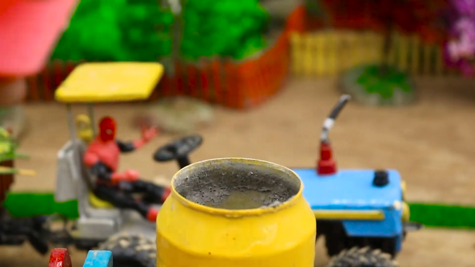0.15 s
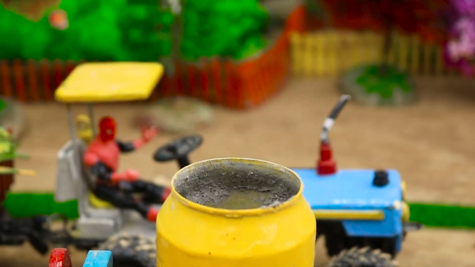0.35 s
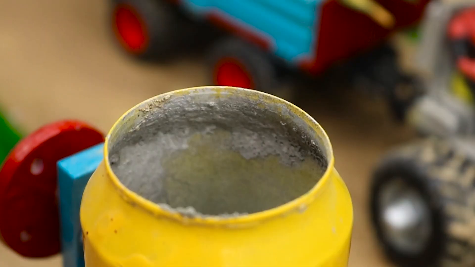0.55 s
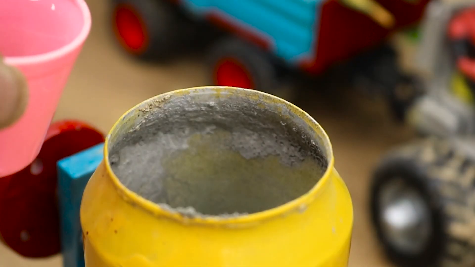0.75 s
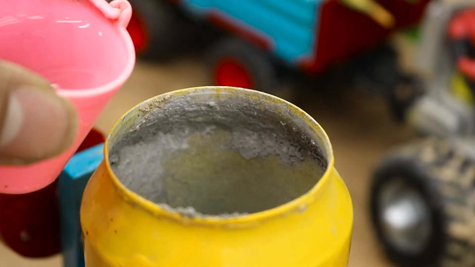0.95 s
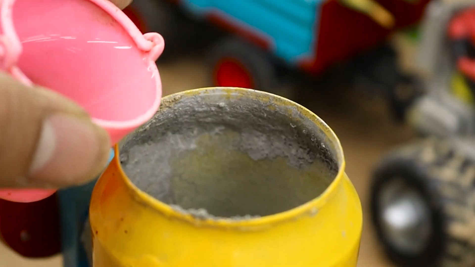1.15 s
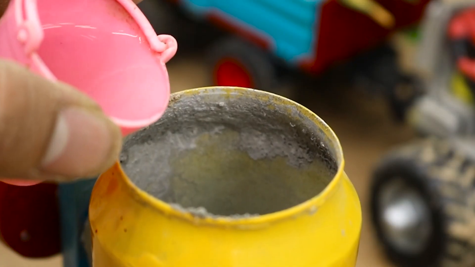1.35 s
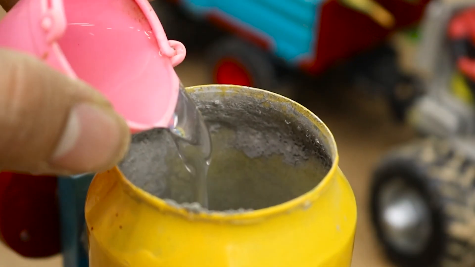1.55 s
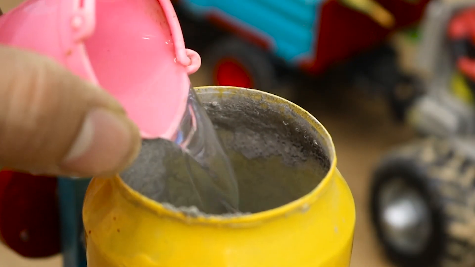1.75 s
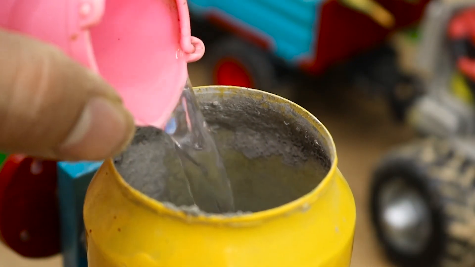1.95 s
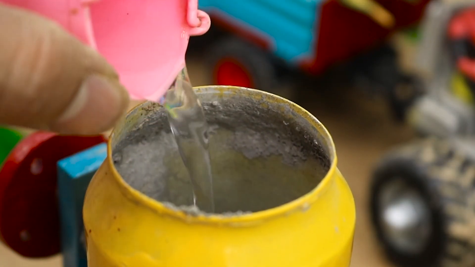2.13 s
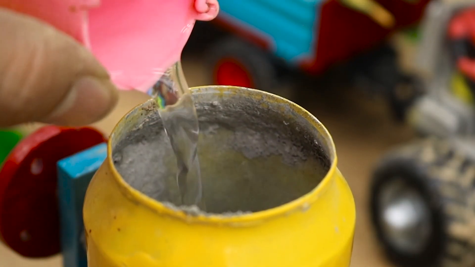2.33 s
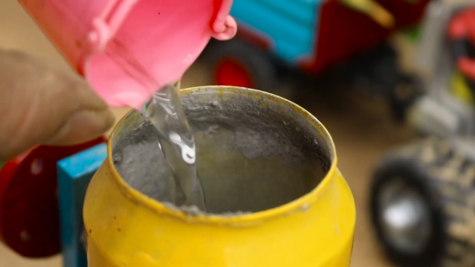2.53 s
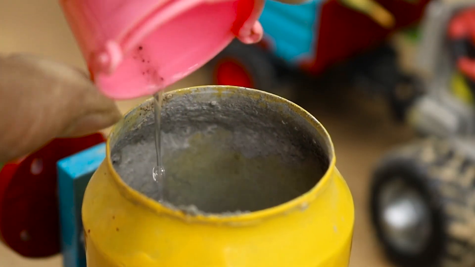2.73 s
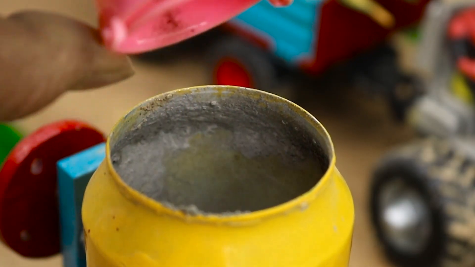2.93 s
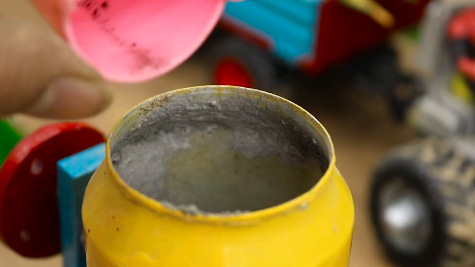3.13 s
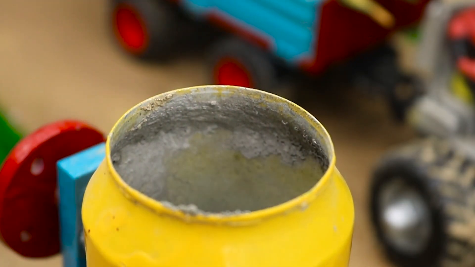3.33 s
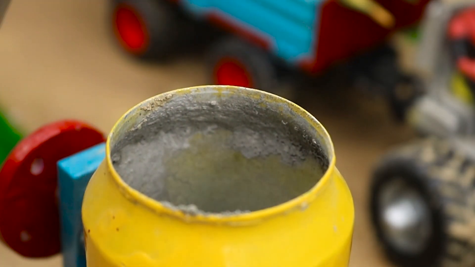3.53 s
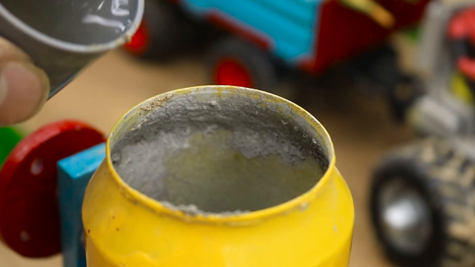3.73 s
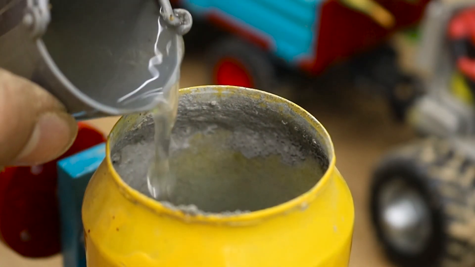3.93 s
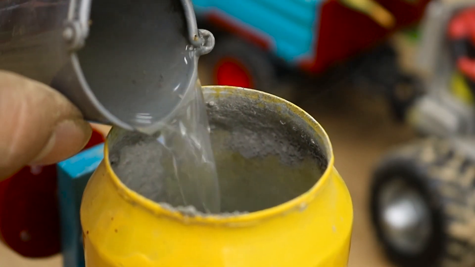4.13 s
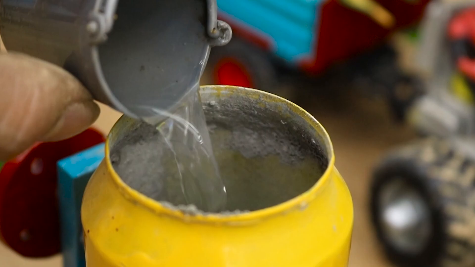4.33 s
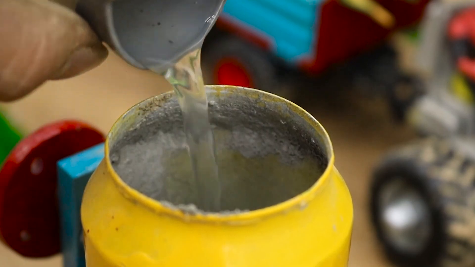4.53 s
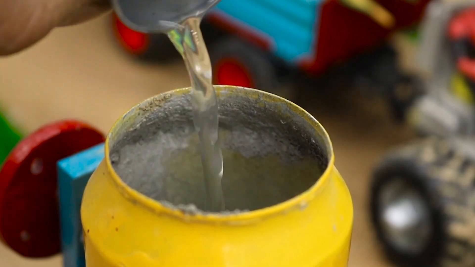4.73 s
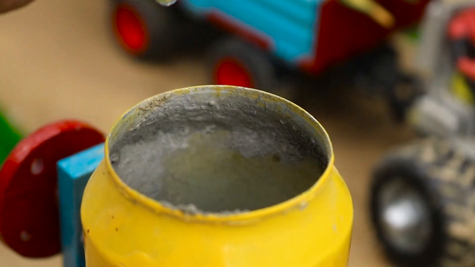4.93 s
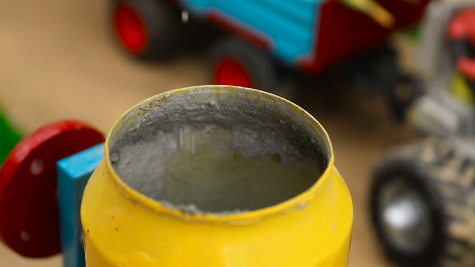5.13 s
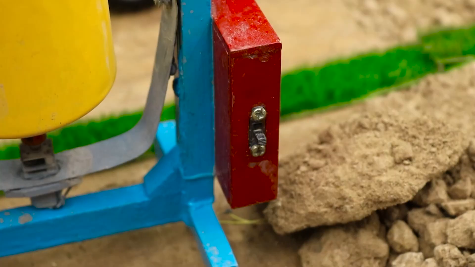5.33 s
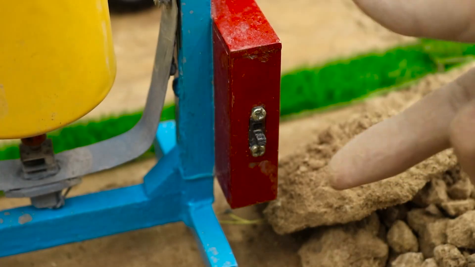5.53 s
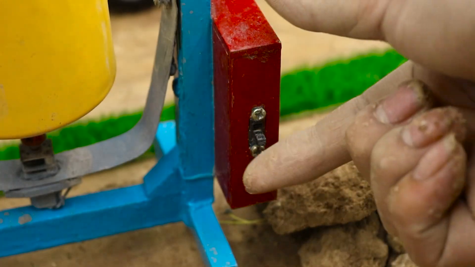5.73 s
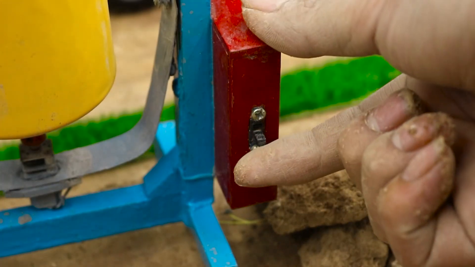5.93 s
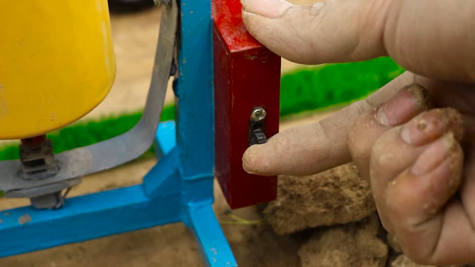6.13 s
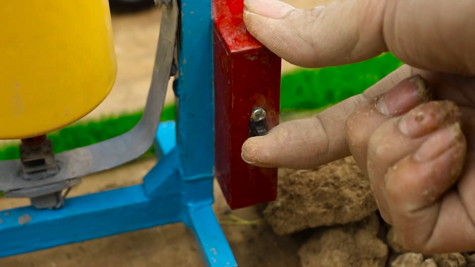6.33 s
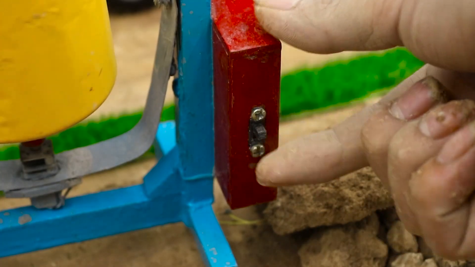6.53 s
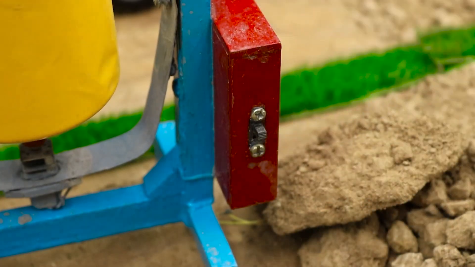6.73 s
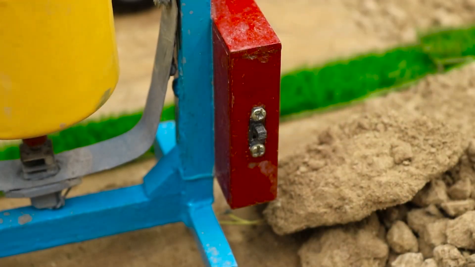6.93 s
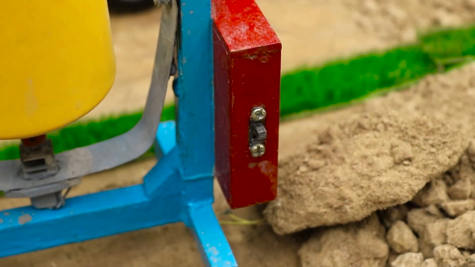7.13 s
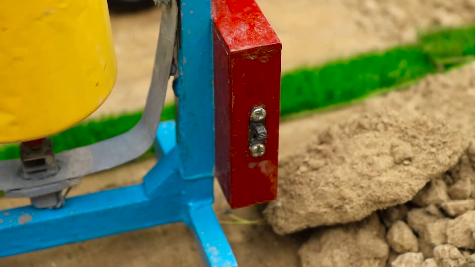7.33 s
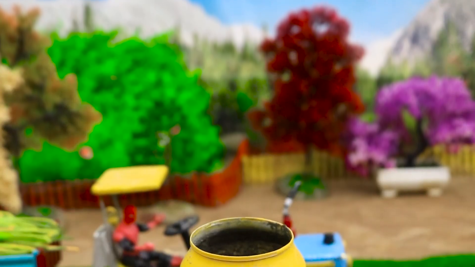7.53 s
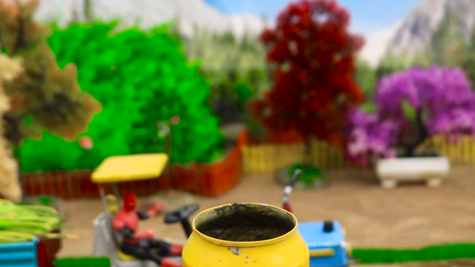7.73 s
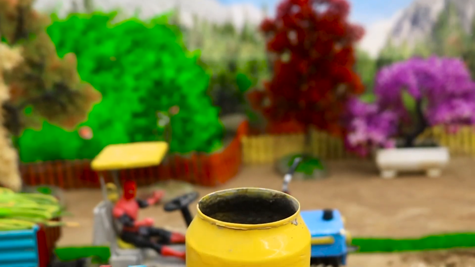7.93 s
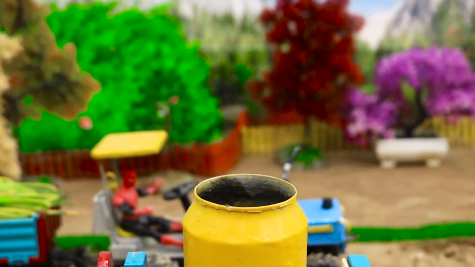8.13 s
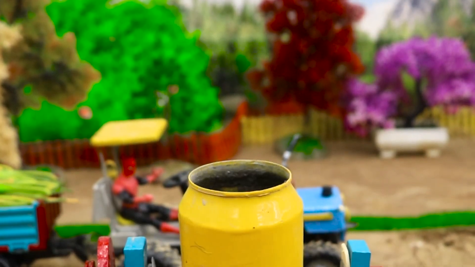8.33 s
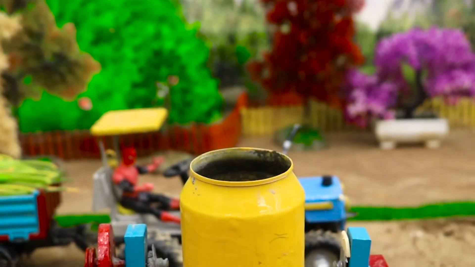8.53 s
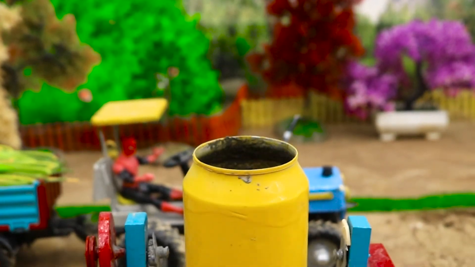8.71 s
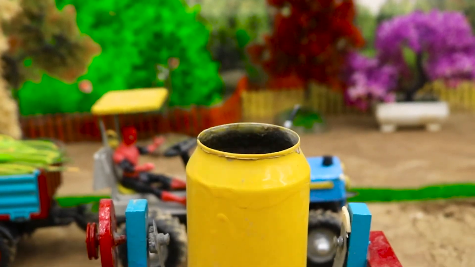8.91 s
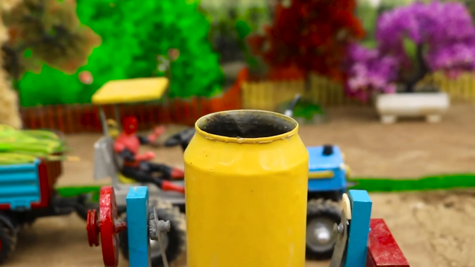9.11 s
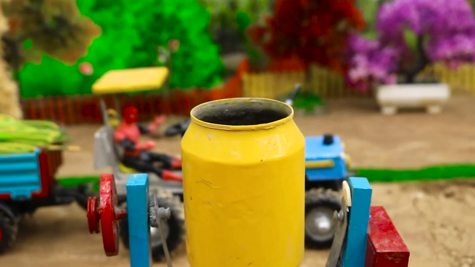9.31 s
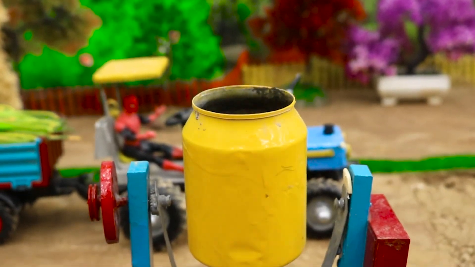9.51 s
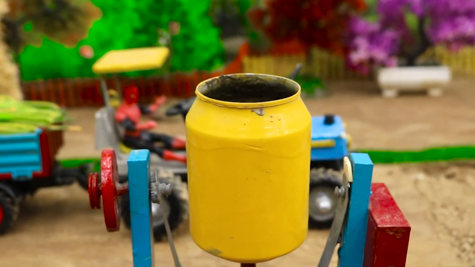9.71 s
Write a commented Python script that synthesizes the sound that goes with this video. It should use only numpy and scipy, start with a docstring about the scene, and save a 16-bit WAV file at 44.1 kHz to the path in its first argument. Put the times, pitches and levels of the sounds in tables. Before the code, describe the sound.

Close up outdoors, a small bucket of water gurgles and splashes into a hollow can drum, then a near-identical pour follows. A bird chirps on the left over a faint low drone. A switch snaps sharply, a small electric motor builds up, and wet gritty mix sloshes round with stones knocking on the thin wall.

```python
"""Toy cement mixer, water and birds

Water splashes from a toy bucket into a can drum, as enveloped sines (bubbles) and filtered noise; the
same pour sounds twice. A switch snaps, motor tones build up and wet mix churns as modulated noise.
Birds on the left are gliding sines, an insect buzzes in narrow noise, a low drone hums throughout."""
import sys
import numpy as np
from scipy import signal
from scipy.fft import rfft, irfft, next_fast_len
from scipy.io import wavfile
from scipy.ndimage import map_coordinates

SR = 44100
rng = np.random.default_rng(int(sys.argv[2]) if len(sys.argv) > 2 else 0)


def log_audio(samples):
    """Write samples as a 16-bit WAV file to the path given in sys.argv[1]."""
    # one column per channel
    frames = np.atleast_2d(samples).T
    # limit to full scale, then quantise
    limited = np.clip(frames, -1, 1)
    pcm = np.round(limited * 32767).astype(np.int16)
    wavfile.write(sys.argv[1], SR, pcm)


N = 435266
TIME = np.arange(N) / SR


def amp(db):
    """Decibels to gain."""
    return 10 ** (np.asarray(db) / 20)


def unit(x):
    """Scaled to rms 1."""
    return x / np.sqrt(np.mean(x ** 2) + 1e-20)


def along(points, hz):
    """(Hz, value) points read on a log frequency axis."""
    f, v = np.transpose(points)
    return np.interp(np.log(hz + 1), np.log(f + 1), v)


def curves(rows, at=TIME):
    """Each column after the time, read at the given moments."""
    s, *cols = np.transpose(rows)
    return [np.interp(at, s, c) for c in cols]


def wobble(rate_hz):
    """Smooth random curve with rate_hz knots a second."""
    knots = rng.standard_normal(int(N * rate_hz / SR) + 4)
    return map_coordinates(knots, [TIME * rate_hz])


def filtered(x, response):
    """x times a response of frequency."""
    m = next_fast_len(x.shape[-1] + 8192)
    spectrum = rfft(x, m) * response(np.fft.rfftfreq(m, 1 / SR))
    return irfft(spectrum, m)[..., :x.shape[-1]]


def add(track, s, sound):
    """Mix a sound into a track at s seconds."""
    part = track[..., round(s * SR):][..., :sound.shape[-1]]
    part += sound[..., :part.shape[-1]]


def rush(spectrum, alike):
    """Coloured stereo noise of rms 1; the mid/side balance sets left-right likeness per frequency."""
    def mid_side(hz):
        turn = np.arccos(np.clip(along(alike, hz), -1, 1)) / 2
        return amp(along(spectrum, hz)) * [np.cos(turn), np.sin(turn)]

    mid, side = filtered(rng.standard_normal((2, N)), mid_side)
    return unit(np.array([mid + side, mid - side]))


def hiss(centre_hz, octaves, size):
    """Noise of rms 1 in one steep-sided resonance."""
    def resonance(hz):
        offset = np.log2((hz + 1) / centre_hz) / octaves
        return 1 / (1 + offset ** 2 / 2) ** 2

    return unit(filtered(rng.standard_normal(size), resonance))


def room(x, t60_s):
    """Diffuse stereo reverberation: x through a decaying noise tail of energy 1 per channel, nominally."""
    t = np.arange(SR // 2) / SR
    tail = rng.standard_normal((2, t.size)) * amp(-60 * t / t60_s) * (1 - np.exp(-t / 0.0034))
    return signal.fftconvolve(x[None], tail / np.linalg.norm(tail[0]), axes=1)[:, :N]


# same pour placed twice: delay/s, end/s, fade before end/s
POURS = [(0, 3.505, .02), (2.2465, 5.44, .77)]


def pours():
    """The same pour twice: the first stops short, the second fades away."""
    once = pour()
    out = 0
    for delay_s, end_s, fade_s in POURS:
        out = out + np.roll(once, round(delay_s * SR), axis=1) * np.clip((end_s - TIME) / fade_s, 0, 1)
    return out


# stream strength: t/s, bubbling level/dB, spray level/dB
STREAM = [(1.449, -78, -58.5), (1.6, -87, -53), (1.68, -43.5, -40.5), (1.86, -24, -31), (2.03, -39, -37.5),
          (2.1, -26.5, -36), (2.33, -36.5, -40.5), (2.85, -39.5, -39.5), (3.08, -39.5, -46),
          (3.22, -48, -52.5), (3.501, -59, -48.5)]
# hollow under the stream: t/s, bubble f/Hz, gulp f/Hz, gulp level re bubbling/dB
HOLLOW = [(1.65, 1184, 947, -17.5), (1.85, 1150, 850, -46.5), (2.1, 1235, 1108, -36.5),
          (2.22, 1212, 783, -11), (2.33, 1315, 575, -2), (2.5, 1350, 426, -6), (2.85, 1493, 363, -5),
          (3.3, 1573, 401, -28)]
# biggest air pockets closing in the drum: t/s, f/Hz, level/dB
PLOPS = [(1.573, 2590, -23), (1.691, 1620, -27), (1.7508, 1104, -10.5), (1.7507, 745, -26.5),
         (1.762, 1208, -35), (1.77, 2660, -7), (1.824, 1290, -17.5), (1.8482, 1100, -18.5),
         (1.876, 1003, -7.5), (1.8834, 1010, -17), (1.933, 1080, -25), (1.949, 1040, -19),
         (2.078, 1157, -9.5), (2.097, 1072, -14.5), (2.129, 975, -22), (2.157, 1210, -22),
         (2.1685, 1295, -12), (2.2247, 1260, -18), (2.2515, 1170, -27), (2.333, 1323, -17),
         (2.347, 1170, -23), (2.3571, 1162, -22), (2.402, 1270, -21.5), (2.468, 1540, -23),
         (2.6023, 1430, -22), (2.6662, 1377, -20), (2.676, 1480, -21.5), (2.751, 1554, -18.5),
         (2.8013, 1486, -13), (2.806, 1580, -16), (2.8187, 1464, -21), (2.8641, 1464, -22),
         (2.884, 1560, -18), (2.9024, 1500, -24), (2.9684, 1370, -21), (3.038, 1400, -20.5)]
# spray spectrum: f/Hz, level/dB
SPRAY = [(290, -40), (500, -52), (839, 0), (1450, -3.5), (1670, -4), (1800, -11.5), (2930, -4.5),
         (5510, -13.5), (6090, -16), (6930, -25), (8360, -30), (13600, -30), (15500, -41.5)]
# left-right likeness of the spray: f/Hz, correlation
WATER_ALIKE = [(300, 0.92), (6000, 1), (12000, 0.28)]
PLOP_CYCLES = 3.57  # until loudest
STREAM_FADE_S = 0.019  # outside the stream's first and last times
DRIBBLE_S, DRIBBLE_CLUMP_DB = 2.94, 3.5  # the stream clumps more from here
GURGLE_DB, GURGLE_CLUMP = -8, .6  # re bubbling; share of the stream's clumping
PATTER_DB = -7  # re spray
GULP_SPREAD, GULP_CYCLES = .1, 4.2  # log pitch scatter; typical cycles until loudest
SPRAY_RATE_HZ, SPRAY_CYCLES = 800, 3.2  # drops per second; typical cycles until loudest
FIZZ_SCATTER_DB = 8


def pour():
    """One tipped bucket: ringing air pockets, bubble swarms and gulps under noise spray, with echo."""
    bubbling_db, spray_db = curves(STREAM)
    bubble_hz, gulp_hz, gulp_db = curves(HOLLOW)
    inside_s = np.minimum(TIME - STREAM[0][0], STREAM[-1][0] - TIME)
    running = np.clip(inside_s / STREAM_FADE_S + 1, 0, 1)
    dribble = np.clip((TIME - DRIBBLE_S) / 0.11, 0, 1)
    clumps_db = (3.5 + DRIBBLE_CLUMP_DB * dribble) * wobble(80)  # the stream breaks up into beads

    s, hz, db = np.transpose(PLOPS)
    plops = bubbles(s, hz, amp(db), PLOP_CYCLES / hz, rise=0.0075)
    bubbling = amp(bubbling_db - 4.0) * swarm(bubble_hz, 300, spread=0.153, cycles=2.6, scatter_db=7.5)
    gurgle_db = bubbling_db + GURGLE_DB + GURGLE_CLUMP * clumps_db
    bubbling += running * amp(gurgle_db) * gurgle(bubble_hz)
    beads = amp(spray_db + PATTER_DB) * patter()
    glugs = amp(bubbling_db + gulp_db - 9.5) * swarm(
        gulp_hz, 130, spread=GULP_SPREAD, cycles=GULP_CYCLES, scatter_db=9)

    droplets = amp(spray_db - 6.5 + clumps_db) * swarm(
        np.full(N, 2900), SPRAY_RATE_HZ, spread=.22, cycles=SPRAY_CYCLES, scatter_db=5.5)
    fizz = amp(spray_db - 18.0 + clumps_db) * swarm(
        np.full(N, 6200), SPRAY_RATE_HZ, spread=0.206, cycles=SPRAY_CYCLES, scatter_db=FIZZ_SCATTER_DB)
    mist = amp(spray_db - 18.0 + 1.41 * clumps_db) * swarm(
        np.full(N, 11800), 620, spread=0.27, cycles=7, scatter_db=6.5)
    spray = running * amp(spray_db - 18.0 + clumps_db) * rush(SPRAY, WATER_ALIKE)

    water = plops + pings() + bubbling + beads + gulps() + glugs + droplets + fizz + mist
    water = water + slaps() + slap_bubbles()
    echo = amp(-16.5) * room(water, t60_s=0.17) + amp(1.5) * room(fizz + mist, t60_s=0.064)
    return water + spray + echo


def bubbles(s, hz, gain, swell_s, rise):
    """Each bubble swells, rings for a few cycles and rises in pitch; hz is its pitch when loudest."""
    t = np.arange(min(int(6 * np.abs(swell_s).max() * SR), 4096))[None] / SR
    u = t / np.abs(swell_s[:, None])
    envelope = gain[:, None] * u ** 2 * np.exp(2 - 2 * u)
    ring = envelope * np.sin(2 * np.pi * hz[:, None] * t * (1 + rise * (u / 2 - 1)))
    where = (s[:, None] * SR).astype(int) + np.arange(t.size)
    return np.bincount(where.ravel(), ring.ravel(), N)[:N]


def swarm(pitch_hz, rate_hz, spread, cycles, scatter_db):
    """Random bubbles round a moving pitch, at rms 1 over the length of the stream."""
    start, end = STREAM[0][0], STREAM[-1][0]
    count = int(rate_hz * (end - start))
    jitter, detune, size, life = rng.standard_normal((count, 4)).T
    s = np.linspace(start, end, count) + jitter / rate_hz / 2
    hz = np.clip(np.interp(s, TIME, pitch_hz) * np.exp(spread * detune), 100, SR / 2)
    gain = amp(scatter_db * np.clip(size, -2, 1.3))
    x = bubbles(s, hz, gain, cycles / hz * np.exp(0.83 * life), rise=0.013)
    return unit(x) * np.sqrt((end - start) * SR / N)


GURGLE_OCTAVES = 0.24


def gurgle(pitch_hz):
    """Merging bubbles as one broad noise resonance, read at a varying speed to follow the pitch."""
    centre_hz = pitch_hz.max()
    noise = hiss(centre_hz, GURGLE_OCTAVES, size=N)
    return unit(map_coordinates(noise, [np.cumsum(pitch_hz / centre_hz)], order=1))


PATTER_RATE_HZ, PATTER_SCATTER_DB, PATTER_T60_S = 150, 3, 0.045


def patter():
    """Beads of the stream hit the pool one after another, each a decaying burst of spray-coloured noise."""
    out, t = np.zeros(N), np.arange(2048) / SR
    start, end = STREAM[0][0], STREAM[-1][0]
    beads = rng.standard_normal((int(PATTER_RATE_HZ * (end - start)), t.size + 2))
    envelope = amp(-60 * t / PATTER_T60_S) * (1 - np.exp(-t / 0.0019)) ** 2
    rings = filtered(beads[:, 2:], lambda hz: amp(along(SPRAY, hz))) * envelope
    times = np.linspace(start, end, len(beads))
    for s, (jitter, size), ring in zip(times, beads[:, :2], rings):
        add(out, s + jitter / PATTER_RATE_HZ / 2, amp(PATTER_SCATTER_DB * min(size, 1.5)) * ring)
    return unit(out) * np.sqrt((end - start) * SR / N)


# gouts landing: t/s, pool splash level/dB, wall slap level/dB, slap f/Hz
SLAPS = [(1.453, -51, -34, 2310), (1.489, -64, -32.5, 3140), (1.5716, -35, -23, 3670),
         (1.651, -21.5, -46, 3030), (1.693, -33, -29, 3000), (1.7506, -9, -26.5, 3170),
         (1.7714, -30, -12, 3100), (1.859, -23, -22, 3070), (1.927, -34, -17.5, 3430),
         (1.996, -29, -24, 3270), (2.1554, -8.5, -25, 3010), (2.2235, -10, -25, 3320),
         (2.333, -28, -17.5, 5380), (2.255, -24, -39, 2590), (2.357, -18, -26.5, 3010),
         (2.438, -26, -27, 3720), (2.4585, -20, -24.5, 3040), (2.497, -23, -40, 2503),
         (2.516, -21, -32, 2540), (2.529, -24, -36, 2800), (2.5447, -19, -25, 5100),
         (2.562, -22, -30, 2945), (2.677, -21, -22.5, 2410), (2.79, -24.5, -50, 2500),
         (2.602, -22.5, -19.5, 6640), (2.6344, -50, -15.5, 2870), (2.8016, -14.5, -32, 3100),
         (2.8483, -11.5, -23.5, 3120), (2.8784, -19, -18.5, 3980), (2.924, -20.5, -23.5, 3220),
         (2.963, -21, -26, 8900), (2.988, -25, -36, 3680), (3.016, -30, -21, 2300), (3.105, -32, -28, 5450),
         (3.1329, -24.5, -23, 3170), (3.142, -27, -23.5, 3040), (3.269, -29.5, -39, 3880)]
# thin water films bursting: t/s, level/dB
SPITS = [(1.623, -28.5), (1.7707, -19.5), (1.973, -26.5), (2.8784, -33), (3.1777, -44)]
# pool splash spectrum: f/Hz, level/dB
SPLASH = [(250, -32), (400, -31), (800, -0.5), (1000, 2.5), (1500, 6), (1850, -9.5), (2500, -1),
          (3500, -19.5), (6000, -33), (12000, -68)]
SIZZLE_DB = -24  # re the slap


def slaps():
    """Gouts: a noise burst about an octave wide round the slap pitch, a sizzle of tiny bubbles, a short splash
    and a sine thump of the hollow."""
    out, t = np.zeros(N), np.arange(4096) / SR
    attack = 1 - np.exp(-t / 0.0014)

    def sizzle(db):
        return amp(db - 60 * t / 0.031) * hiss(12200, octaves=0.23, size=t.size)

    for s, body_db, db, hz in SLAPS:
        gulp_hz = curves(HOLLOW, s)[1]
        splash = unit(filtered(rng.standard_normal(t.size), lambda f: amp(along(SPLASH, f))))
        thump = np.sin(2 * np.pi * gulp_hz * t)
        body = splash * amp(body_db - 8.0 - 60 * t / 0.05) + thump * amp(body_db - 13.0 - 60 * t / 0.051)
        burst = amp(db - 13.5 - 60 * t / 0.058) * hiss(hz, octaves=0.96, size=t.size)
        add(out, s, (burst + sizzle(db + SIZZLE_DB) + body) * attack)
    for s, db in SPITS:
        add(out, s, sizzle(db) * attack)
    return out


SLAP_BUBBLE_DB, SLAP_BUBBLE_S = -14, 0.0037  # re the slap; mean delay


def slap_bubbles(count=6):
    """Each gout drives a handful of small bubbles under, ringing near its slap pitch."""
    s, _, db, hz = np.repeat(SLAPS, count, axis=0).T
    delay, detune, size = rng.standard_normal((s.size, 3)).T
    hz = np.clip(hz * np.exp(0.217 * detune), 500, SR / 3)
    gain = amp(db + SLAP_BUBBLE_DB + 2 * size)
    return bubbles(s + SLAP_BUBBLE_S * delay ** 2, hz, gain, 3.9 / hz, rise=.006)


# deep gulps of the hollow: t/s, level/dB
GULPS = [(2.168, -20), (2.2235, -28.5), (2.25, -33), (2.292, -40), (2.318, -34.5), (2.337, -28),
         (2.354, -31), (2.412, -42), (2.459, -36), (2.566, -36), (2.703, -42), (2.885, -36), (3.036, -35.5)]
GULP_T60_S = .09


def gulps():
    """Big air pockets sound the hollow as decaying sines that track its gulp pitch."""
    out, t = np.zeros(N), np.arange(SR // 8) / SR
    for s, db in GULPS:
        phase = 2 * np.pi * np.cumsum(curves(HOLLOW, s + t)[1]) / SR
        add(out, s, amp(db - 60 * t / GULP_T60_S) * np.tanh(t / 0.0027) * np.sin(phase))
    return out


# flung droplets landing: t/s, f/Hz, level/dB
DROPLETS = [(1.634, 4300, -36), (1.7114, 5943, -30), (1.828, 5555, -29), (1.8415, 5555, -23.5),
            (1.8615, 8613, -29.5), (1.8945, 4823, -30.5), (1.9237, 3570, -23), (1.9447, 10034, -26),
            (1.9953, 3120, -25), (2.021, 2670, -31), (2.1334, 5857, -28), (2.163, 8656, -28),
            (2.253, 2740, -26.5), (2.313, 6890, -32), (2.346, 6890, -26), (2.347, 10034, -28.5),
            (2.438, 3660, -27.5), (2.461, 9100, -25.5), (2.4988, 2497, -28.5), (2.602, 7040, -19),
            (2.6698, 2975, -24), (2.9648, 9733, -22.5), (2.987, 3710, -22.5)]
DROPLET_CYCLES = 6  # until loudest


def pings():
    """A flung droplet lands with a tiny noise splash and leaves a ringing bubble."""
    t = np.arange(2048) / SR
    s, hz, db = np.transpose(DROPLETS)
    out = bubbles(s, hz, amp(db - 2), DROPLET_CYCLES / hz, rise=0.006)
    for s, hz, db in DROPLETS:
        envelope = amp(db - 11.5 - 60 * t / 0.03) * np.tanh(t / 0.0011)
        add(out, s, envelope * hiss(hz, octaves=0.7, size=t.size))
    return out


# slide switch closing: t/s, level/dB
SWITCH = [(6.3687, -4)]
# switch box modes: f/Hz, level/dB, t60/s
BOX = [(1720, -24, 0.025), (3040, -19, 0.019), (4970, -17, 0.045), (5330, -23, 0.028), (6700, -16, 0.027),
       (7340, -27, 0.017), (8500, -11, 0.017), (12000, -25, 0.022)]
# snap spectrum: f/Hz, level/dB
SNAP = [(88, -31), (150, -4), (1290, -17), (2450, 0), (4160, -8), (4860, -1), (5790, -9), (8560, -5),
        (14500, -15), (16000, -23)]


def switch():
    """The slider drags for an instant, snaps home and rings its box: noise cracks and decaying sines."""
    out, t = np.zeros((2, N)), np.arange(SR // 5) / SR

    def crack():
        side = amp(-41) * rng.standard_normal(t.size) * np.array([[1], [-1]])
        noise = rng.standard_normal(t.size) + side
        return unit(filtered(noise, lambda hz: amp(along(SNAP, hz))))

    for s, db in SWITCH:
        ring = sum(amp(level - 60 * t / t60_s) * np.sin(2 * np.pi * hz * t) for hz, level, t60_s in BOX)
        snap = crack() * (amp(db + 7 - 60 * t / 0.0031) + amp(db - 19.5 - 60 * t / 0.14))
        add(out, s - .005, amp(db - 27.0 - 60 * t / 0.036) * crack())
        add(out, s, amp(db + 2.0) * ring + snap)
    return out


def run_up(rise_db, rise_s):
    """Decibels below full level while the mixer gets going."""
    return -rise_db * np.clip(1 - (TIME - SWITCH[0][0]) / rise_s, 0, 1)


# motor and gear tones: f/Hz, level re the whine/dB, pitch wander/share
WHINE = [(175.7, -21, 0.0186), (242.7, -12.5, 0.0041), (277.5, -20, 0.0044), (322.4, -25, 0.0036),
         (433.8, -6, 0.012), (520, -18, 0.00635), (670.4, -4.5, 0.00699), (695, -11, 0.0094),
         (730, -15, 0.00363), (1067, -16.5, 0.0028), (1450, -16, 0.00203), (2020, -16.5, 0.00238),
         (2466, -20, 0.001985), (3285, -20, 0.00333), (3970, -19.5, 0.0076)]
# frame rumble spectrum: f/Hz, level/dB
RUMBLE = [(8.8, -24), (15, 6.5), (27, -1.5), (37, -1.5), (80, -19.5), (86, -24), (105, 0), (140, -24),
          (230, -120)]
# left-right likeness of mixer noise: f/Hz, correlation
MIX_ALIKE = [(60, 0.59), (130, 0.11), (290, 0.44), (640, 0.71), (1410, 0.58), (3100, 0.91), (6820, 1),
             (15000, 0.92)]
# jolts of heavy lumps: t/s, rumble change/dB
JOLTS = [(7.78, 9.5), (8.2, -4), (9.16, 3)]
JOLT_S, JOLT_FADE_S = .03, .11  # time constants before and after the peak
SHAFT_HZ, SPEED_WANDER = 121.4, 0.001946  # wander share common to all tones
HUM_DB, HUM_RISE_DB, HUM_RISE_S = -22, 16.5, 0.72
RUMBLE_DB, RUMBLE_RISE_DB, RUMBLE_RISE_S = -23, 17, 1.5
GEARS_DB, GEARS_RISE_DB, GEARS_RISE_S = -34.5, 15.5, 0.99
WHINE_WAVER_DB = 2


def motor():
    """Rotor imbalance hums as a sine, gears whine as wandering sines, the frame rumbles as low noise."""
    gears_db = GEARS_DB + run_up(GEARS_RISE_DB, GEARS_RISE_S)
    hum_db = HUM_DB + run_up(HUM_RISE_DB, HUM_RISE_S) + 0.7 * wobble(10)
    jolts_db = sum(db * np.exp(-np.maximum((s - TIME) / JOLT_S, (TIME - s) / JOLT_FADE_S))
                   for s, db in JOLTS)
    rumble_db = RUMBLE_DB + run_up(RUMBLE_RISE_DB, RUMBLE_RISE_S) + jolts_db + 2.4 * wobble(7.9)
    speed = 1 + SPEED_WANDER * wobble(6)

    def tone(hz, wander):
        phase = 2 * np.pi * np.cumsum(hz * (speed + wander * wobble(28))) / SR
        return np.sqrt(2) * np.sin(phase)

    hum = amp(hum_db) * tone(SHAFT_HZ, wander=0.0042) * amp([[-.5], [.5]])
    chatter = 1 + .3 * wobble(90)
    whine = sum(amp(db - 1.5 + WHINE_WAVER_DB * wobble(16)) * tone(hz, wander)
                for hz, db, wander in WHINE)
    gears = whine * amp(gears_db) * chatter
    rumble = amp(rumble_db) * rush(RUMBLE, MIX_ALIKE) * amp([[-1.5], [1]])
    return hum + gears + amp(-8.0) * room(gears, t60_s=0.15) + rumble


THUD_DB, THUD_HZ, THUD_T60_S = -29, 36, 0.37  # level re the jolt's


def thuds():
    """Each jolt rocks the frame: a deep, decaying narrow-band noise swing."""
    out, t = np.zeros(N), np.arange(SR // 2) / SR
    for s, db in JOLTS:
        envelope = amp(db + THUD_DB - 60 * t / THUD_T60_S) * np.tanh(t / JOLT_S)
        add(out, s - JOLT_S, envelope * hiss(THUD_HZ, octaves=0.37, size=t.size))
    return out


# churning strength: t/s, slosh level/dB
CHURN = [(6.46, -46.5), (7.03, -36.5), (7.63, -32), (7.82, -34), (8.86, -26.5), (8.97, -29.5),
         (9.87, -29.5)]
# wet mix spectrum: f/Hz, level/dB
MIX = [(88, -39), (150, -8), (179, -13.5), (249, -12), (367, -14), (428, -18), (481, -13.5), (596, -16.5),
       (670, -15), (798, -15.5), (3300, -29.5), (5050, -37.5), (7170, -33), (8060, -41), (15600, -45)]
# lumps dragging along the can: t/s, half length/s, level/dB, f/Hz
SCRAPES = [(7.611, .018, -43, 1680), (7.71, 0.018, -38, 1850), (8.185, 0.027, -33.5, 1320),
           (8.44, 0.04, -36, 1000), (8.84, 0.02, -35, 1400), (9.5, 0.025, -34, 1150),
           (8.597, 0.023, -30.5, 1430), (8.597, 0.015, -39, 6240), (8.73, 0.06, -36, 6800),
           (9.18, 0.025, -37, 2000), (9.345, 0.019, -36, 6950), (9.36, .03, -28.5, 2600),
           (9.59, 0.086, -38, 6600)]
# thin tones swelling over the churn, motor whines and can squeals: t/s, half length/s, level/dB, f/Hz
THIN_TONES = [(8.11, 0.11, -37, 1505), (8.22, 0.14, -47, 1560), (8.3, 0.58, -45, 1456),
              (8.62, 0.19, -42, 1462), (8.462, .07, -31.5, 177), (8.878, 0.035, -32.5, 1094),
              (9.14, 0.074, -44, 2450), (9.56, 0.1, -42.5, 2520), (9.8, 0.14, -42, 2483)]
SCRAPE_OCTAVES, THIN_TONE_OCTAVES = 0.49, 0.0087
SCRAPE_GRIT_DB = -1  # sand dragged with a lump, re the lump
GRIT_DB, GRIT_FOLLOWS = -38, 0.49  # at average churning; dB per dB of slosh
GRIND_DB, GRIND_RATE_HZ = 2.2, 220  # roughness; knots per second
SHAKE_HZ, SHAKE_DEPTH = 234, 0.094  # the motor shakes the sand and slosh


def churn():
    """Wet mix slides round the can: low noise slosh, high noise grit, scrapes and thin swelling tones."""
    slosh_db, = curves(CHURN)
    mean_db = slosh_db[TIME > SWITCH[0][0]].mean()
    grit_db = GRIT_DB + GRIT_FOLLOWS * (slosh_db - mean_db)
    mix = rush(MIX, MIX_ALIKE)
    low = filtered(mix, lambda hz: 1 / (1 + (hz / 2100) ** 4))

    def can(hz):  # the thin wall sings with the sand
        return 1 + 0.31 / (1 + ((hz - 7100) / 500) ** 2)

    scrapes, drag = strokes(SCRAPES, SCRAPE_OCTAVES)
    thin_tones, _ = strokes(THIN_TONES, THIN_TONE_OCTAVES)
    slosh = amp(slosh_db - 2.5 + 0.95 * wobble(40) + GRIND_DB * wobble(GRIND_RATE_HZ)) * unit(low)
    sand = np.hypot(amp(grit_db + 0.038 * wobble(9.8)), amp(SCRAPE_GRIT_DB) * drag)
    grit = sand * amp(0.53 * wobble(400) + 1.9 * wobble(45)) * unit(filtered(mix - low, can))
    shake_phase = 2 * np.pi * np.cumsum(SHAKE_HZ * (1 + 0.0364 * wobble(60))) / SR
    shake = 1 + SHAKE_DEPTH * np.sin(shake_phase)
    return (slosh + grit) * unit(shake) + (scrapes + thin_tones) * amp(4.3 * wobble(500))


def strokes(rows, octaves):
    """Sounds that swell and fade, each in one noise resonance; also their joint envelope."""
    sound, envelope = np.zeros(N), np.zeros(N)
    for s, half_s, db, hz in rows:
        stroke = amp(db) * np.hanning(int(2 * half_s * SR))
        add(sound, s - half_s, stroke * hiss(hz, octaves, size=stroke.size))
        add(envelope, s - half_s, stroke)
    return sound, envelope


# stones knocking on the can: t/s, level/dB, f/Hz
KNOCKS = [(6.689, -26, 6500), (7.567, -19, 2400), (7.604, -15.5, 1700), (7.924, -21.5, 4360),
          (7.9927, -27, 2900), (8.588, -14.5, 2200), (8.704, -17.5, 7300), (8.7884, -16.5, 3360),
          (8.947, -32, 2400), (9.0212, -19.5, 4540), (9.158, -17.5, 4200), (9.275, -18.5, 3300),
          (9.3243, -21, 6900), (9.3464, -4.5, 3060), (9.4811, -16, 2870), (9.61, -16.5, 2460)]
# can wall modes, damped by the mix: f/Hz, half width/Hz, level/dB
CAN = [(1520, 190, 4), (2190, 200, -1.5), (2910, 180, 0), (3230, 150, -0.5), (3940, 350, 1),
       (5500, 200, -26), (6960, 400, 2.5)]
KNOCK_T60_S, KNOCK_RING_DB, KNOCK_CRACK_DB, KNOCK_OCTAVES = 0.12, -11.5, -10.5, 0.95  # levels re knock


def ticks():
    """Stones knock on the can: a short noise crack, and the damped ring of noise through the wall modes."""
    out, t = np.zeros(N), np.arange(SR // 6) / SR

    def wall(f):
        return sum(amp(db) / (1 + ((f - hz) / width_hz) ** 2) for hz, width_hz, db in CAN)

    for s, db, centre_hz in KNOCKS:
        ring = unit(filtered(hiss(centre_hz, KNOCK_OCTAVES, size=t.size), wall))
        ring = ring * amp(KNOCK_RING_DB - 60 * t / KNOCK_T60_S)
        crack = hiss(centre_hz, KNOCK_OCTAVES, size=t.size) * amp(KNOCK_CRACK_DB - 60 * t / 0.016)
        add(out, s, amp(db) * (ring + crack))
    return out


# held whistles: t/s, length/s, lowest f/Hz, level/dB, opening fall/Hz, closing bend/Hz, swell/dB
WHISTLES = [(1.107, 0.056, 2030, -36, 92, 166, 6), (1.4, 0.2, 1796, -35.5, 124, 31, 8),
            (1.714, 0.23, 2396, -26, 136, 5, 1.5), (5.351, 0.11, 3037, -35.5, 54, -120, 23),
            (5.673, 0.15, 3940, -37, 49, 168.5, 24.5), (5.886, .058, 3076, -28, 2, 1, 2),
            (5.998, 0.064, 3143, -31, 32, -1, 0.5), (6.006, 0.051, 2960, -36, 0.5, 0, 2)]
# quick slurs: t/s, length/s, first f/Hz, middle f/Hz, last f/Hz, level/dB
SLURS = [(0.1, 0.05, 2880, 3000, 2800, -72), (0.215, 0.06, 2570, 2640, 2600, -69),
         (.345, 0.049, 3370, 3370, 3500, -59), (0.506, 0.041, 1750, 1730, 1720, -54),
         (.54, .03, 1850, 2300, 3100, -59), (0.56, 0.051, 3280, 3270, 2650, -59),
         (.622, .022, 3200, 3900, 4350, -64), (0.73, .042, 2850, 2830, 2800, -60),
         (.748, 0.033, 4300, 3600, 3400, -67), (0.82, 0.036, 3050, 3170, 2950, -69),
         (0.875, 0.031, 3300, 3400, 3100, -64), (0.903, 0.037, 3350, 2850, 2070, -56.5),
         (0.939, 0.025, 2240, 2390, 2330, -50), (1.032, 0.059, 2200, 2920, 2300, -67),
         (2.082, 0.024, 2570, 2410, 2250, -22.5), (2.104, 0.025, 2517, 2280, 1830, -22),
         (2.134, 0.012, 2460, 2450, 2550, -18), (2.152, 0.028, 2490, 2370, 2200, -22.5),
         (3.475, 0.088, 3530, 3530, 3466, -58), (3.612, 0.029, 3430, 3200, 2800, -62),
         (3.63, 0.074, 2690, 2640, 2600, -63), (3.72, 0.052, 3710, 3580, 3520, -53),
         (5.306, 0.017, 3050, 3080, 3120, -44), (5.333, 0.044, 3230, 3300, 3350, -55),
         (5.448, 0.027, 2870, 2660, 2600, -39), (5.554, 0.021, 3750, 4050, 4200, -58),
         (5.52, 0.054, 2550, 2580, 2710, -54), (5.591, 0.032, 2500, 2380, 2300, -54.5),
         (5.632, 0.044, 4340, 4420, 4020, -53), (5.646, 0.062, 2050, 2050, 2000, -54.5),
         (5.707, 0.019, 2060, 2060, 2010, -46), (5.85, 0.024, 2020, 1975, 1940, -53.5),
         (5.87, 0.055, 3600, 3590, 3560, -54), (5.883, 0.016, 2610, 2780, 3000, -39),
         (5.936, 0.015, 3010, 2490, 1900, -38), (5.957, 0.05, 3490, 2920, 2800, -50),
         (5.963, 0.015, 3770, 4300, 4750, -37), (5.949, 0.013, 4060, 3900, 3720, -29),
         (5.97, 0.046, 4790, 3740, 3150, -35.5), (6.123, 0.033, 2330, 1980, 2000, -43.5),
         (6.144, 0.03, 3000, 2800, 2850, -49), (6.16, 0.021, 1120, 1320, 1650, -46),
         (6.175, 0.062, 1600, 1996, 1760, -36.5), (6.257, 0.015, 3220, 2540, 2150, -40),
         (6.265, 0.014, 4300, 3480, 3400, -32), (6.322, 0.018, 4200, 4020, 4000, -35.5),
         (6.372, 0.014, 3530, 3030, 2700, -19), (6.403, 0.012, 2750, 3100, 3050, -23),
         (6.596, 0.015, 3100, 2950, 2650, -32), (6.467, 0.033, 3930, 3620, 2950, -39.5),
         (6.496, 0.044, 2320, 2345, 2200, -28.5), (6.541, 0.016, 4200, 3360, 2700, -32),
         (6.602, 0.013, 2920, 3430, 4400, -31), (6.528, 0.019, 2320, 2010, 1830, -32),
         (6.555, 0.014, 2000, 1860, 1800, -32), (6.645, 0.042, 2060, 2310, 2400, -31.5)]
# buzzy notes: t/s, length/s, first f/Hz, middle f/Hz, last f/Hz, level/dB
TRILLS = [(6.235, 0.032, 2300, 2720, 3200, -30), (6.34, 0.04, 4500, 4180, 3800, -34.5),
          (6.382, 0.025, 2650, 2465, 2550, -28), (6.575, 0.026, 2730, 2520, 2480, -29),
          (6.68, 0.019, 2830, 3240, 3540, -28.5)]
SAG_LOW, SWELL_END = 0.68, .6  # shares of a whistle: lowest point before the closing bend, end of swell
TRILL_DEPTH_HZ, TRILL_HZ = 205, 288
TWITTER_DB, TWITTER_HZ, TWITTER_OCTAVES, TWITTER_END_S = -66.5, 2145, 0.99, 8.7  # lowest first pitch; range
WALLS_S, WALLS_DB = (.004, .035), -21  # echo delay range; level of each


def birds():
    """A close bird on the left whistles gliding sines, echoed by nearby walls; faint far twitter."""
    song, far = np.zeros(N), np.zeros(N)
    for s, length_s, hz, db, fall_hz, hook_hz, swell_db in WHISTLES:
        pitches_hz = hz + fall_hz * (1 - np.array([0, .5, 1]) / SAG_LOW) ** 2
        note = whistle(length_s, pitches_hz, hook_hz=hook_hz)
        swell = np.minimum(np.linspace(0, 1, note.size) / SWELL_END - 1, 0)
        add(song, s, note * amp(db + swell_db * swell))
    for s, length_s, *pitches_hz, db in SLURS:
        add(song, s, amp(db) * whistle(length_s, pitches_hz))
    for s, length_s, *pitches_hz, db in TRILLS:
        add(song, s, amp(db) * whistle(length_s, pitches_hz, TRILL_DEPTH_HZ))

    notes = rng.random(size=(170, 5))
    for k, (when, length, pitch, bend, glide) in enumerate(notes):
        octaves = TWITTER_OCTAVES * pitch + np.array([0, bend - .5, glide - .5]) * 0.85
        note = whistle(0.029 + 0.04 * length, TWITTER_HZ * 2 ** octaves)
        add(far, (k + when) / len(notes) * TWITTER_END_S, amp(TWITTER_DB) * note)

    song *= amp(1.1 * wobble(110))
    delays_s = rng.uniform(*WALLS_S, (4, 2, 1))  # four echoes per channel
    walls = filtered(song, lambda hz: sum(np.exp(-2j * np.pi * hz * s) for s in delays_s))
    near = song * amp([[3], [-8]]) + amp(WALLS_DB) * walls
    tails = amp(-15.0) * room(song, t60_s=0.87) + amp(-16) * room(song, t60_s=0.16)
    return near + tails + room(far, t60_s=.4)


NOTE_EDGE_S, HOOK_S = .008, 0.017  # time constants of the soft edges and the closing bend


def whistle(length_s, pitches_hz, warble_hz=0, hook_hz=0):
    """A sine with faint octave bends through three pitches, perhaps with a fast warble or closing hook."""
    u = np.linspace(0, 1, int(length_s * SR))
    glide_hz = np.polyval(np.polyfit([0, .5, 1], pitches_hz, 2), u)
    hz = glide_hz + warble_hz * np.sin(2 * np.pi * TRILL_HZ * length_s * u)
    phase = 2 * np.pi * np.cumsum(hz + hook_hz * np.exp((u - 1) * length_s / HOOK_S)) / SR
    edges = np.tanh(u * length_s / NOTE_EDGE_S) * np.tanh((1 - u) * length_s / NOTE_EDGE_S)
    return edges * (np.sin(phase) + amp(-43.0) * np.sin(2 * phase))


# far insect's buzzes: t/s, length/s, level/dB
BUZZES = [(0.017, 0.18, -62), (0.228, 0.17, -65), (3.441, 0.1085, -53), (3.59, 0.13, -60)]


def insect():
    """Thin, high buzzes in pairs: narrow noise bands with soft ends."""
    out = np.zeros(N)
    for s, length_s, db in BUZZES:
        size = int(length_s * SR)
        buzz = signal.windows.tukey(size) * hiss(5580, octaves=0.071, size=size)
        add(out, s, amp(db - 10.5) * buzz)
    return out


# drone noise spectrum: f/Hz, level/dB
DRONE = [(12, -63), (20, -20), (41, -6.5), (64, 0), (87, -10.5), (124, -12), (147, -19.5), (189, -19.5),
         (302, -20), (328, -34.5), (457, -31.5), (818, -40.5), (3010, -51.5), (3360, -52), (15000, -71)]
# left-right likeness of the drone noise: f/Hz, correlation
DRONE_ALIKE = [(60, 0.95), (180, 0.83), (550, 0.82), (1650, 0.11), (4970, 0.02), (15000, 0.1)]


def drone():
    """A low, wavering background hum of three harmonics on soft noise."""
    phase = 2 * np.pi * np.cumsum(59.3 + 2.253 * wobble(11)) / SR
    hum = amp(-40.5 + 1.5 * wobble(9.1)) * np.sin(phase)
    hum += amp(-44.5 + 2.3 * wobble(22)) * np.sin(2 * phase)
    hum += amp(-54.0 + 4.2 * wobble(5)) * np.sin(3 * phase)
    return hum + amp(-37) * rush(DRONE, DRONE_ALIKE)


def scene():
    """All sources summed; the mixer runs from the moment the switch closes."""
    power = np.clip((TIME - SWITCH[0][0]) / 0.065, 0, 1)
    mixer = power * (motor() + churn() + ticks() + thuds())
    return pours() + mixer + switch() + birds() + insect() + drone()


CLIP_TOP, TOP_HZ = .72, 15750  # ceiling of the soft clip; band limit


def record(dry):
    """Rounds off the highest peaks, then cuts steeply above the band limit."""
    rounded = dry / (1 + (dry / CLIP_TOP) ** 6) ** (1 / 6)
    return filtered(rounded, lambda hz: 1 / (1 + (hz / TOP_HZ) ** 160))


dry = scene()
out = record(dry)
log_audio(out)
```